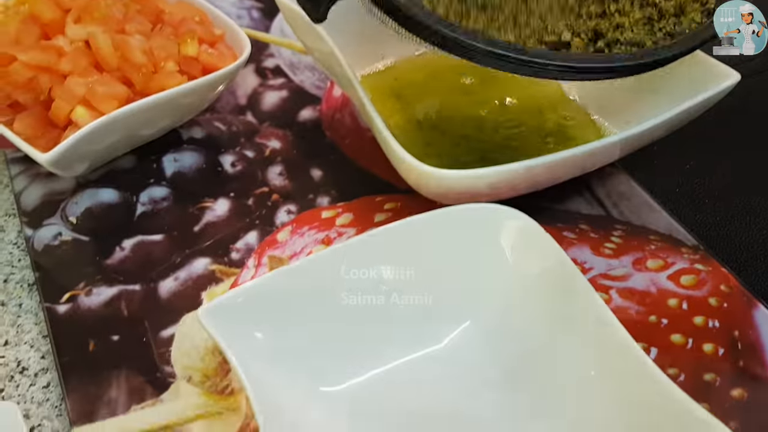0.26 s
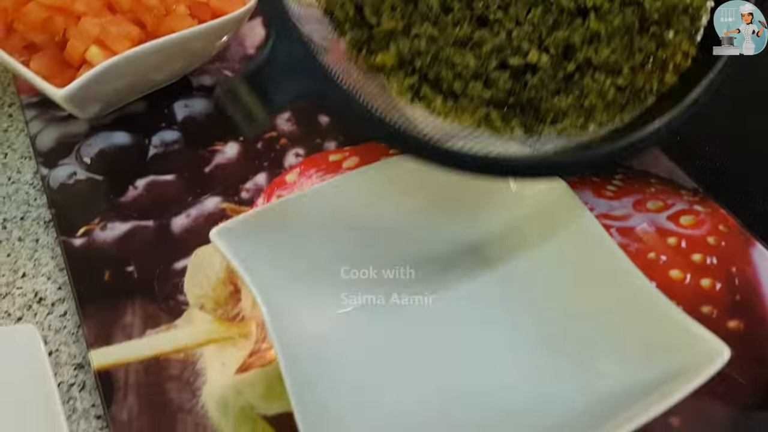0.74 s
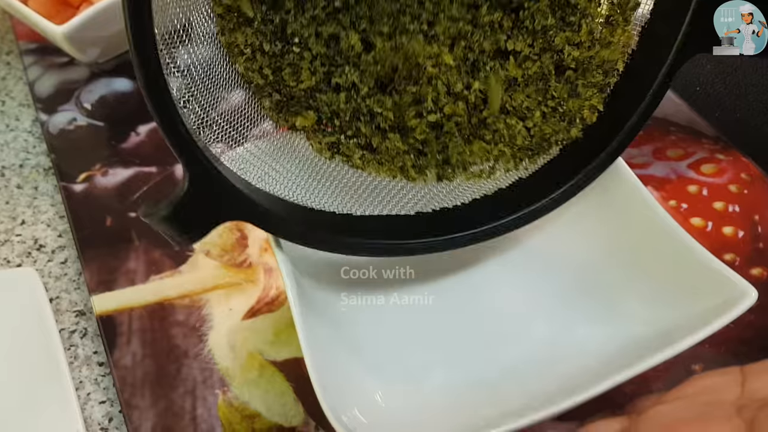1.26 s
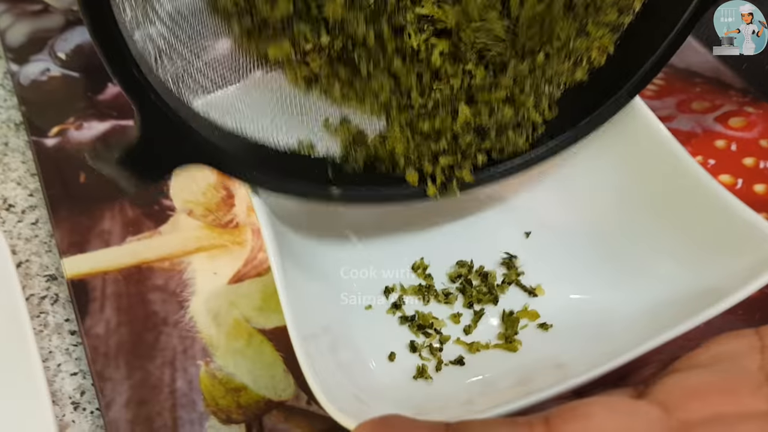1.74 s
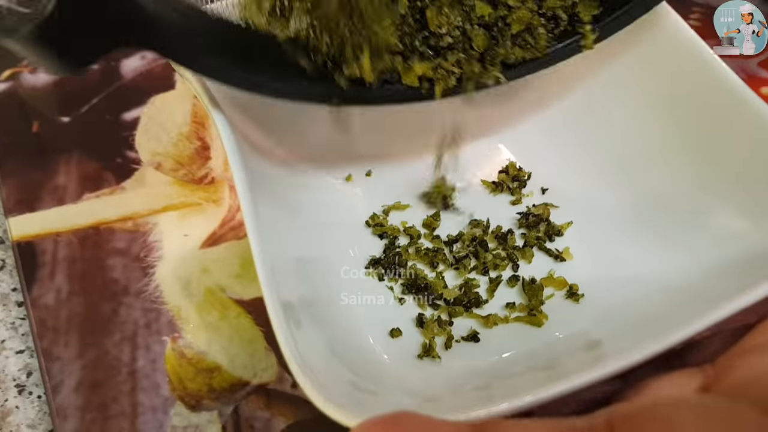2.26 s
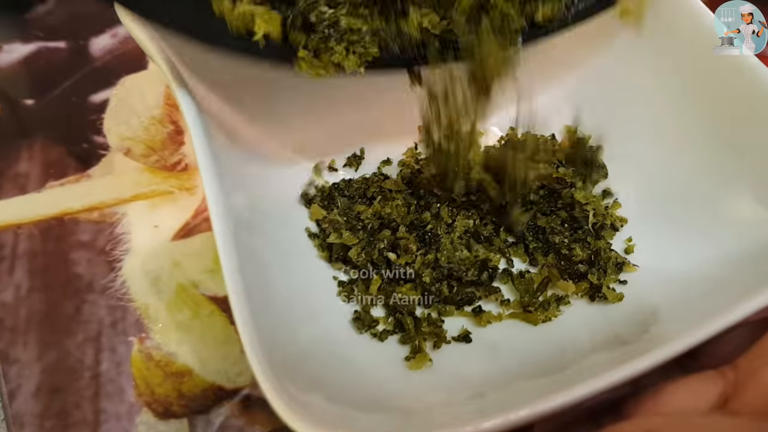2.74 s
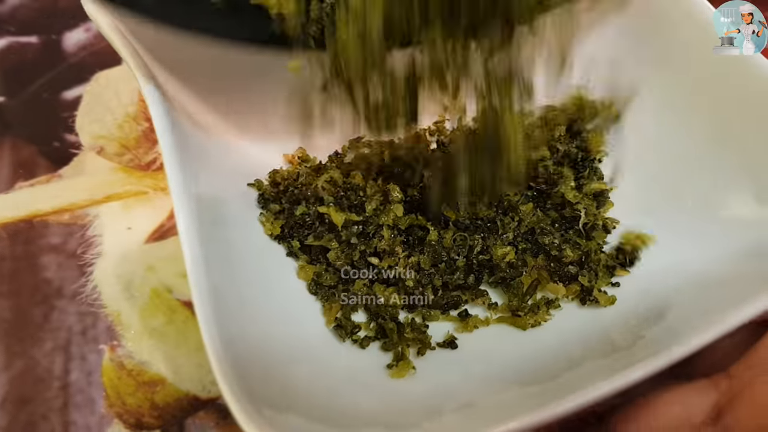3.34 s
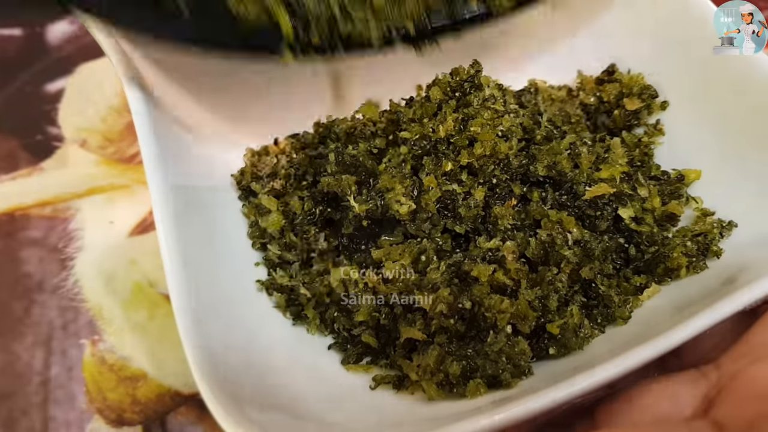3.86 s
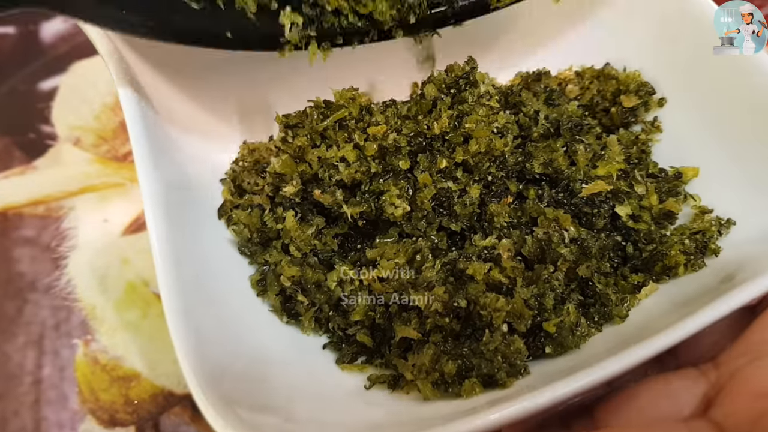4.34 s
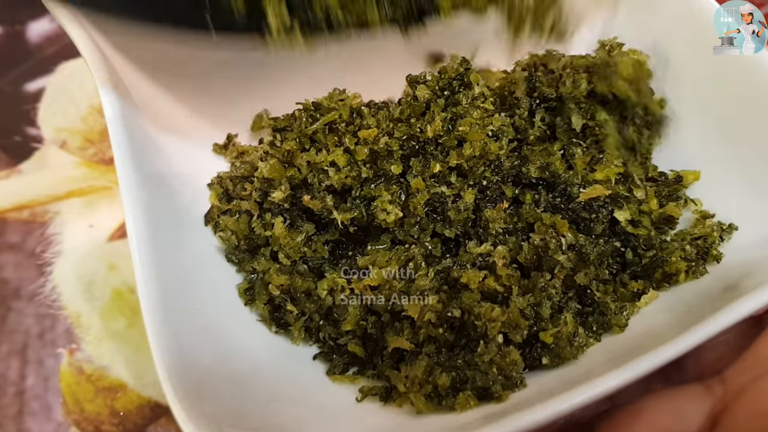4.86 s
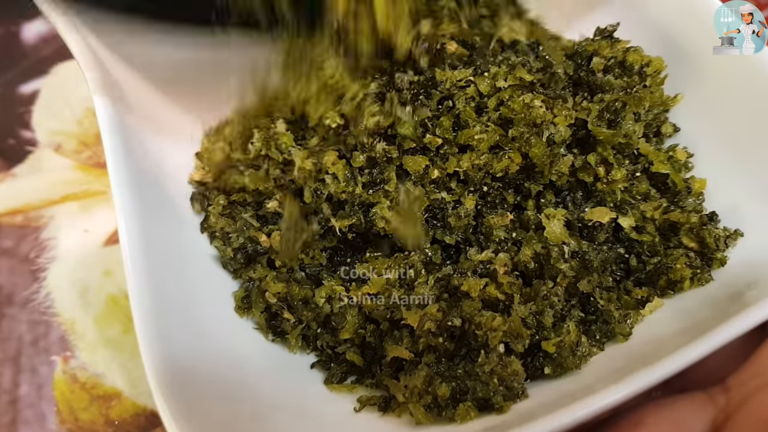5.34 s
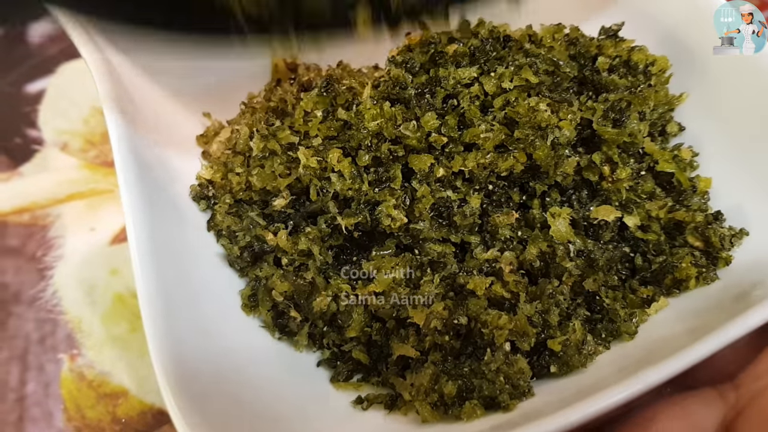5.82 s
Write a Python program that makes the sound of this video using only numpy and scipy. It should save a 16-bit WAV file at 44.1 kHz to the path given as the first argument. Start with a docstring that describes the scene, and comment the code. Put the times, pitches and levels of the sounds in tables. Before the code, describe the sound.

A small, hard-surfaced kitchen, heard close at one microphone. A faint low electrical hum beats slowly beneath soft rumble and thin hiss throughout. During the first second there are tiny squeaks and a sleeve swish that grows until about 1.1 s, when the strainer rim makes a light double contact. Two loud, dry metallic knocks follow at 1.37 and 1.54 s, each led by a smaller touch, with rattling mesh, damped ring and a short room tail; the second is brighter, with some ceramic ring. A weaker bump comes at 1.66 s and a tiny dry snap at 1.87 s. Crumbs tinkle from 2.0 s, densest around 2.4 to 2.7, and again at 3.3 to 3.6 s with muted taps. Sparse ticks and soft rustles come near 4.1, 4.85, 5.25 and 5.6 s; dull light knocks at 5.2, 5.5 and 6.0 s end it.

```python
"""A hand knocks the rim of a mesh strainer over a ceramic dish in a small hard kitchen, heard at one microphone.
Each knock rings strainer, counter and dish as decaying modes, and shaped noise is the rattling mesh.
Fried crumbs rain on the dish: soft random strikes make it tinkle, grainy noise is crumbs tumbling on crumbs.
A sleeve swishes, faint squeaks and brief rumble swells pass, a motor hums over low rumble and thin hiss.
Its shaft turns a little slower than the mains, so their tones beat."""
import sys
import numpy as np
from scipy import signal
from scipy.fft import rfft, irfft, next_fast_len
from scipy.io import wavfile
from scipy.ndimage import uniform_filter1d, map_coordinates

SR = 44100
rng = np.random.default_rng(int(sys.argv[2]) if len(sys.argv) > 2 else 0)


def waveform_to_disk(signal):
    """Save audio, clipped to [-1, 1], as 16-bit WAV at the path in sys.argv[1]."""
    frames = np.transpose(np.atleast_2d(signal))
    scaled = np.clip(frames, -1, 1) * 32767
    samples = np.round(scaled).astype(np.int16)
    wavfile.write(sys.argv[1], SR, samples)


def elevation(decibels):
    """Turn decibel levels (scalar or array-like) into linear amplitude ratios."""
    levels = np.asarray(decibels, float)
    return 10 ** (levels / 20)


N = 268480


def unit(x):
    """Scaled to rms 1."""
    return x / np.sqrt(np.mean(x ** 2) + 1e-20)


def along(points, hz):
    """Values at hz, read from (Hz, value) points on a log frequency axis."""
    point_hz, value = np.transpose(points)
    return np.interp(np.log(hz + 1), np.log(point_hz + 1), value)


def curves(rows):
    """One value per sample for each column after the time."""
    s, *columns = np.transpose(rows)
    return [np.interp(np.arange(N) / SR, s, column) for column in columns]


def wobble(rate):
    """A smooth random curve, rate knots a second."""
    knots = rng.standard_normal(int(N * rate / SR) + 4)
    return map_coordinates(knots, [np.arange(N) * rate / SR])


def coloured(x, spectrum):
    """x filtered by a (Hz, dB) spectrum, rms 1."""
    size = next_fast_len(len(x) + 8192)
    gain = elevation(along(spectrum, np.fft.rfftfreq(size, 1 / SR)))
    return unit(irfft(rfft(x, size) * gain, size)[:len(x)])


def ring(modes, t, boost, scatter_db, chatter_s=0., blur=0.):
    """Decaying modes at random strengths; chatter sustains them for a while, blur makes their phases drift."""
    hz, db, t60 = np.transpose(modes)[:, :, None]
    db = db + along(boost, hz) + scatter_db * rng.standard_normal(hz.shape)
    drift = blur * np.cumsum(rng.standard_normal((len(hz), len(t))), axis=1) / np.sqrt(SR)
    drift = uniform_filter1d(drift, size=90, axis=1)
    envelope = elevation(db - 60 * np.maximum(t - chatter_s, 0) / t60)
    start_phase = rng.uniform(0, 2 * np.pi, hz.shape)
    return np.sum(envelope * np.sin(2 * np.pi * hz * t + drift + start_phase), axis=0)


# how long the room rings at each frequency: (pitch_hz, t60_s)
ROOM_DECAY = [(100, 0.56), (500, 0.28), (2000, 0.33), (5000, .3), (12000, 0.52)]


def kitchen(x, build_s):
    """A fresh tail of energy 1: reflections build up, then each frequency dies at its own speed."""
    hz, t, noise = signal.stft(rng.standard_normal(SR // 2), SR, nperseg=256)
    decay = elevation(-60 * t / along(ROOM_DECAY, hz)[:, None])
    tail = signal.istft(noise * decay, SR, nperseg=256)[1]
    tail = tail * (1 - np.exp(-np.arange(len(tail)) / SR / build_s))
    return signal.fftconvolve(x, tail / np.linalg.norm(tail))[:len(x)]


# harmonics of the motor shaft, then of the mains: (multiple, level_db)
SHAFT_TONES = [(1, -73), (2, -73), (3, -78.5), (4, -73), (5, -83)]
MAINS_TONES = [(2, -65.5), (4, -79), (6, -85.5)]
SHAFT_HZ, MAINS_HZ = 49.35, 50.05
CANCEL_S = 0.535  # a moment when shaft and mains tones oppose


def motor_hum():
    """Shaft and mains harmonics lie close in pitch, so they beat; each tone wavers slightly."""
    t = np.arange(N) / SR - CANCEL_S

    def tone(hz, db):
        level = np.sqrt(2) * elevation(db + 0.57 * wobble(4.1))
        return level * np.sin(2 * np.pi * hz * t + 0.19 * wobble(3))

    mains = sum(tone(multiple * MAINS_HZ, db) for multiple, db in MAINS_TONES)
    shaft = sum(tone(multiple * SHAFT_HZ, db) for multiple, db in SHAFT_TONES)
    return mains - shaft + tone(107, -81.5)  # one more faint tone


# background noise over time: (start_s, rumble_db, hiss_db)
FLOOR_LEVELS = [(0, -70.5, -74), (1.1, -65.5, -72), (1.9, -72.5, -73.5), (2.7, -64, -74), (3.3, -73.5, -76),
                (4.8, -72, -76), (5.3, -68, -74.5), (6.09, -72, -76)]
# colours of the low rumble and of the thin hiss: (pitch_hz, level_db)
RUMBLE_COLOUR = [(12, -40), (20, -11.5), (107, -7.5), (126, -4.5), (151, -13), (206, -7.5), (424, -22.5),
                 (586, -21.5), (653, -23.5), (1500, -36.5), (1950, -64), (3300, -120)]
HISS_COLOUR = [(710, -36.5), (1200, -6.5), (1420, -11), (1470, -10), (1750, -6), (2740, -12), (2980, -9.5),
               (5140, -4), (6370, 0), (15500, -11)]


def rumble_and_hiss():
    """Two coloured noises with slowly moving levels; the rumble is restless."""
    rumble_db, hiss_db = curves(FLOOR_LEVELS)
    rumble = elevation(rumble_db + 0.6 * wobble(4)) * coloured(rng.standard_normal(N), RUMBLE_COLOUR)
    return rumble + elevation(hiss_db) * coloured(rng.standard_normal(N), HISS_COLOUR)


# faint squeaks and brief swells of the low rumble: (start_s, length_s, pitch_hz, width_hz, level_db)
SQUEAKS_AND_SWELLS = [(0.108, 0.12, 3960, 300, -70), (0.359, 0.056, 2080, 400, -74),
                      (0.417, 0.075, 3920, 300, -72), (0.491, 0.12, 1970, 400, -70.5),
                      (0.548, 0.024, 860, 1500, -67.5), (4.513, 0.13, 1153, 300, -76),
                      (5.358, 0.17, 476, 200, -64), (5.861, .04, 2070, 503, -78.5),
                      (2.298, 0.015, 1860, 300, -75.5), (3.033, 0.038, 1870, 400, -78),
                      (0.066, 0.14, 343, 148, -65.5), (0.864, 0.16, 460, 302, -70),
                      (2.039, 0.17, 362, 200, -68), (2.517, 0.16, 367, 300, -65),
                      (4.061, 0.096, 2570, 3014, -71.5)]


def squeaks_and_swells():
    """Short bands of noise that swell and fade."""
    out = np.zeros(N)
    for s, length_s, hz, width_hz, db in SQUEAKS_AND_SWELLS:
        size = round(length_s * SR)
        band = [(hz / 2, -60), (hz - width_hz / 2, -6), (hz, 0), (hz + width_hz / 2, -6), (hz * 2, -60)]
        noise = coloured(rng.standard_normal(size), band)
        out[round(s * SR):][:size] += elevation(db) * np.hanning(size) * noise
    return out


# sleeve brushing as the strainer swings over: (start_s, level_db)
SLEEVE_LEVEL = [(0.3, -102), (0.366, -76.5), (0.414, -83), (0.54, -67.5), (0.852, -60.5), (1.1, -66)]
# colour of the brushing cloth: (pitch_hz, level_db)
CLOTH_COLOUR = [(350, -29), (600, -7), (791, -2), (1460, 6), (1720, 4), (2670, 10), (7180, -1),
                (12000, -39), (15600, -68.5), (22000, -120)]


def sleeve():
    """The sleeve's swish: cloth-coloured noise of uneven level, over by the second contact on the rim."""
    t = np.arange(N) / SR
    on = (t > SLEEVE_LEVEL[0][0]) & (t < RIM_KNOCKS[1][0])
    level = elevation(curves(SLEEVE_LEVEL)[0] + wobble(9.3))
    return on * level * coloured(rng.standard_normal(N), CLOTH_COLOUR)


# knocks on the rim, lead-in touches and bounces included; thud and dish are relative to the knock:
# (start_s, level_db, tilt_db per octave roughly, counter_thud_db, dish_ring_db)
RIM_KNOCKS = [(1.1136, -22, 1, -24, -37), (1.122, -17.5, -4.5, -27.5, -41), (1.36, -23, 1.5, -18, -15),
              (1.3741, -4.5, 0.9, -37.5, -42), (1.517, -21.5, 0.5, -25, -6),
              (1.541, -3.5, 2.55, -30.5, -20.5), (1.656, -22, -2, -20, -48.5), (2.73, -32, -3, -13, -42.5),
              (2.793, -41.5, -6, -10.5, -34.5), (3.264, -34, -0.5, -14.5, -40),
              (3.463, -32.5, -4, -13.5, -35), (3.576, -25.5, -2.5, -16.5, -34.5),
              (3.684, -37.5, -5, -9, -38.5), (5.181, -34, -5.5, -13.5, -34.5), (5.496, -36, -4.5, -10, -45),
              (5.612, -48.5, -6.5, -7, -35), (5.994, -29.5, -2.5, -16, -35), (6.024, -33.5, -9, -12.5, -38)]
# modes of the strainer, damped by the hand and the food: (pitch_hz, level_db, t60_s)
STRAINER_MODES = [(589, 0, .095), (790, -1, .1), (855, 3, .085), (1015, -14, .05), (1218, -11, .06),
                  (1355, -8, .05), (1626, -9, .05), (1705, -8, .045), (1900, -11, .045), (2195, -10, .05),
                  (2420, -9, .045), (2648, -11, .045), (2890, -10, .045), (3090, -16, .045),
                  (3665, -16, .04), (3985, -16, .045), (4600, -17, .035), (4957, -20, .04),
                  (5450, -23, .035), (6340, -27, .04), (6977, -22, .06), (7340, -31, .04)]
# modes of the counter under the dish: (pitch_hz, level_db, t60_s)
COUNTER_MODES = [(42, -20, .6), (80, -6, .5), (98, -9, .4), (175, -7, .16), (298, -8, .16), (348, -6, .12),
                 (450, 1, .16)]
# modes of the ceramic dish, which the crumbs strike too: (pitch_hz, level_db, t60_s)
DISH_MODES = [(1093, -22, .96), (1630, -13, .13), (2200, -18, .13), (2770, -3, .17), (2885, -5, .12),
              (3920, -14, .12), (4280, 1, .13), (5220, -12, .13), (6150, -10, .11), (6860, -7, .09),
              (7020, -4, .1), (7460, -10, .1), (7750, -3, .08), (7860, -3, .11), (8800, -9, .1),
              (9750, -20, .08), (10600, -17, .08), (11000, -22, .06), (11700, -21, .07), (12400, -19, .07),
              (13000, -19, .07), (13600, -24, .06)]
CHATTER_S = 0.012  # how long a contact lasts


def knocks():
    """Each blow chatters for some ms, rings strainer, counter and dish, rattles the mesh and fills the kitchen."""
    out, t = np.zeros(N + SR), np.arange(SR * 2 // 3) / SR
    for s, db, tilt_db, thud_db, dish_db in RIM_KNOCKS:
        # the deep boom grows faster than the thud
        boom_db = thud_db - 12 + 1.1 * (db + thud_db + 46)
        # a clack near 1.6 kHz, stronger in bright knocks
        clack_db = 0.9 + 1.6 * tilt_db + 1.5 * rng.standard_normal()

        mesh = [(150, -42), (350, -16), (600, -6), (900, -1), (1600, tilt_db + clack_db),
                (3000, -6 + 2 * tilt_db), (7000, -21.5 + 3 * tilt_db), (9000, -38 + 3 * tilt_db),
                (12000, -52 + 3 * tilt_db), (16000, -72.5)]
        rattle = elevation(4.5 - 60 * np.maximum(t - CHATTER_S / 2, 0) / 0.068)
        rattle *= coloured(rng.standard_normal(len(t)), mesh)
        rattle *= np.clip(0.4 + 1.8 * t / CHATTER_S, 0, 1)  # the wires take a moment to join in

        rim_boost = [(590, 0.4 * tilt_db), (850, 1), (1000, 0), (1600, 0.7 * tilt_db + clack_db),
                     (2500, 1.3 * tilt_db), (8000, 3 * tilt_db)]
        body = ring(STRAINER_MODES, t, rim_boost, scatter_db=1.35, chatter_s=CHATTER_S, blur=14)
        counter_boost = [(98, boom_db), (170, thud_db), (320, thud_db + 2.5), (450, thud_db)]
        body += elevation(17) * ring(COUNTER_MODES, t, counter_boost, scatter_db=0.83, blur=8)
        body *= np.clip(0.35 + 0.8 * t / CHATTER_S, 0, 1)  # strainer and counter swell during the contact

        dish_boost = [(1100, -1), (1700, 2), (6000, 3.5), (8000, -11.5), (13000, -13.5)]
        dish = elevation(dish_db + 6) * ring(DISH_MODES, t, dish_boost, scatter_db=3.5, blur=5.4)

        onset = (1 - np.exp(-t / 0.0008)) ** 2
        blow = (body + rattle + dish) * onset
        in_room = blow + elevation(-5) * kitchen(blow, build_s=0.002)
        out[round(s * SR):][:len(t)] += elevation(db - 13) * in_room
    return out[:N]


# one dry snap: (start_s, level_db, pitch_hz, t60_s)
DRY_SNAP = [(1.867, -33, 7900, .0035)]


def snap():
    """A sine with a very sharp onset that dies within milliseconds."""
    out, t = np.zeros(N), np.arange(SR // 5) / SR
    for s, db, hz, t60 in DRY_SNAP:
        envelope = (1 - np.exp(-t / 0.000087)) * elevation(db - 60 * t / t60)
        out[round(s * SR):][:len(t)] += envelope * np.sin(2 * np.pi * hz * t)
    return out


def tilted(db, tilt_db, hz):
    """Level at hz of a strike given at 2.8 kHz; the tilt acts up to 7.5 kHz."""
    return db + tilt_db * np.log2(np.clip(hz, 2800, 7500) / 2800)


# showers of small crumbs shaken loose; the levels are relative:
# (densest_s, ringing_db, tilt_db per octave, rustle_db)
CRUMB_SHOWERS = [(1.92, -85.5, 7, -81), (2.28, -86.5, 11.5, -75), (2.38, -79, 11, -88),
                 (2.47, -60.5, 3.8, -74.5), (2.599, -70, 9, -70.5), (2.69, -75.5, 9.5, -86),
                 (2.86, -90, 9, -83), (2.96, -92.5, 15.5, -80.5), (3.16, -88.5, 15.5, -77.5),
                 (3.31, -88, 15.5, -72.5), (3.41, -83, 5, -73.5), (3.512, -65.5, 7, -68),
                 (3.59, -64, 2.5, -72.5), (3.7, -88, 12, -87), (4.06, -92, 15, -78.5), (4.21, -93, 15, -81),
                 (4.84, -92, 9, -88.5), (5.06, -93, 12.5, -79.5), (5.2, -95.5, 9, -77),
                 (5.28, -92, 16.5, -80.5), (5.6, -94, 17, -81)]
# colour of crumbs tumbling on crumbs: (pitch_hz, level_db)
RUSTLE_COLOUR = [(880, -52), (1500, -7.5), (3060, -13), (5300, -1), (5780, -7), (7210, 0), (15000, -25.5)]
GATHER_DB_PER_S, THIN_DB_PER_S = 437, 195  # a shower swells fast and thins out slower


def showers():
    """Random tiny strikes drive one resonator per dish mode; grainy noise is the rustle."""
    s, ring_db, tilt_db, rustle_db = np.transpose(CRUMB_SHOWERS)
    after = np.arange(N) / SR - s[:, None]
    density = elevation(np.where(after < 0, GATHER_DB_PER_S * after, -THIN_DB_PER_S * after))

    struck = rng.random(N) < 400 / SR  # about 400 hits a second
    hits = unit(struck * elevation(1.55 * rng.exponential(size=N)))
    boost = [(3000, 5.5), (4300, -10), (6000, -7), (7500, -2), (11000, 0)]
    ringing = np.zeros(N)
    for hz, db, t60 in DISH_MODES[1:]:  # crumbs are too light to move the lowest mode
        level = elevation(tilted(ring_db, tilt_db, hz) + along(boost, hz)) @ density
        r = elevation(-60 / (t60 * SR))  # decay per sample
        turn = 2 * np.pi * hz / SR
        strikes = hits * rng.standard_normal(N) * elevation(db) * level * np.sqrt(2 - 2 * r * r)
        ringing += signal.lfilter([np.sin(turn)], [1, -2 * r * np.cos(turn), r * r], strikes)

    grains = rng.standard_normal(N) * (0.3 + 4.4 * (rng.random(N) < 0.02))
    rustle = elevation(rustle_db + 7) @ density * coloured(grains, RUSTLE_COLOUR)
    return elevation(-5.5) * ringing + rustle


# the loudest single crumbs on the glaze; levels are relative, extra is for the modes near 4.3 kHz:
# (start_s, level_db, tilt_db per octave, extra_db)
SINGLE_CRUMBS = [(2.0028, -58.5, -3.5, 1), (2.1303, -69.5, -1, -4), (2.265, -65, 5, -16),
                 (2.3607, -72, 6.5, 5.5), (2.3906, -62, -1.5, -9), (2.4253, -56, -0.5, 1),
                 (2.4485, -56, 2.5, 7), (2.49, -79, -.7, -5), (2.555, -60.5, 5, -18.5),
                 (2.5757, -57, -0.2, -4.5), (2.5994, -62, 6, 3.5), (2.682, -75, 19, -3),
                 (2.851, -65.5, 11, -5), (2.9086, -80.5, 15, -12), (2.9494, -71.5, 9, -17),
                 (3.319, -57, 0, -13), (3.404, -65, 0.8, -6.5), (3.429, -59, -1, -6),
                 (4.0442, -75.5, 10, -15.5), (4.0813, -64.5, -2, -12), (4.161, -67, 2, -18),
                 (4.204, -62, 2.5, -19), (4.828, -64.5, -1, -16.5), (4.8716, -63.5, -3, -22),
                 (5.2852, -61, 0.5, -16), (5.5874, -83, 14, -8)]


def single_crumbs():
    """Crumbs strike the dish at random spots, so each one excites every mode differently."""
    out, t = np.zeros(N + SR), np.arange(SR // 5) / SR
    soft = 1 - np.exp(-t / 0.0008)  # a crumb is a soft striker
    for s, db, tilt_db, extra_db in SINGLE_CRUMBS:
        lifts = [(2800, 0), (4300, extra_db), (5700, 3.5), (7500, 0)]  # favours modes near 5.7 kHz
        boost = [(hz, tilted(db, tilt_db, hz) + lift_db) for hz, lift_db in lifts]
        strike = soft * ring(DISH_MODES[1:], t, boost, scatter_db=2.5, blur=8)
        out[round(s * SR):][:len(t)] += elevation(-4) * strike
    return out[:N]


def crumbs():
    """The single crumbs, the showers and the snap, with the kitchen's tail around them."""
    direct = single_crumbs() + showers() + snap()
    return direct + elevation(-7) * kitchen(direct, build_s=0.003)


def scene():
    """Everything at one microphone."""
    strainer_and_dish = knocks() + crumbs()
    sleeve_and_small_noises = sleeve() + squeaks_and_swells()
    background = motor_hum() + rumble_and_hiss()
    return (strainer_and_dish + sleeve_and_small_noises + background)[None]


def low_pass(x):
    """Removes everything above the highest recorded frequency."""
    return signal.sosfilt(signal.butter(12, 15640, fs=SR, output="sos"), x)


def record(dry):
    """The microphone's input stage rounds off the highest peaks."""
    rounded = dry / (1 + np.abs(dry / 0.85) ** 4) ** (1 / 4)
    return low_pass(rounded)


dry = scene()
out = record(dry)
waveform_to_disk(out)
```